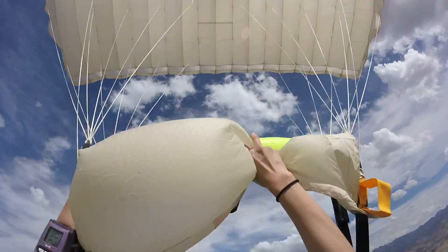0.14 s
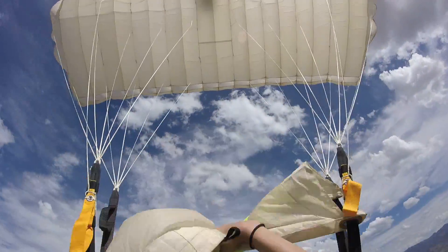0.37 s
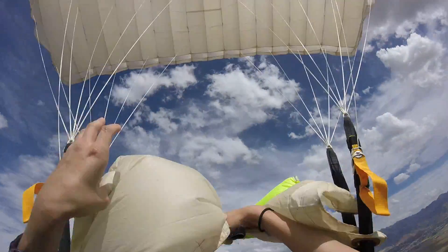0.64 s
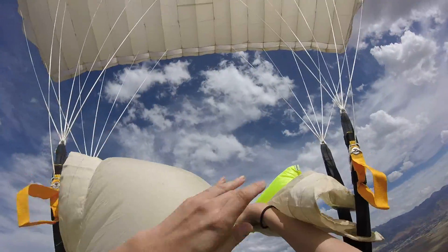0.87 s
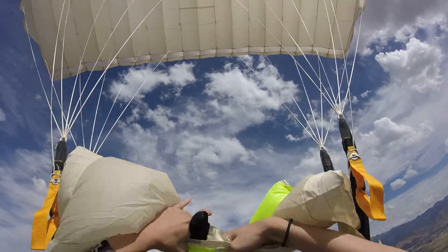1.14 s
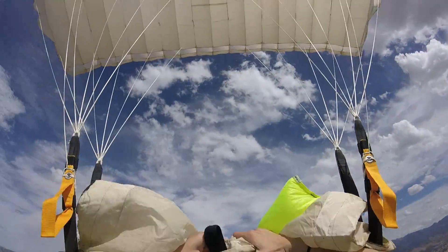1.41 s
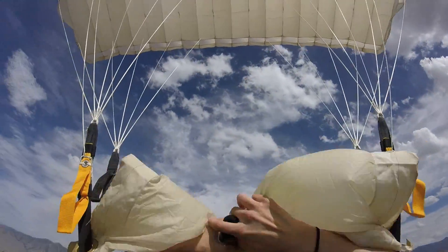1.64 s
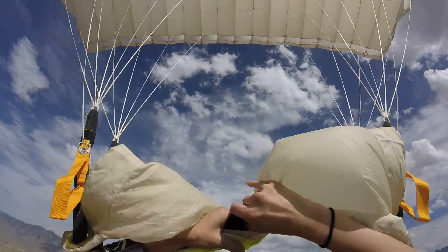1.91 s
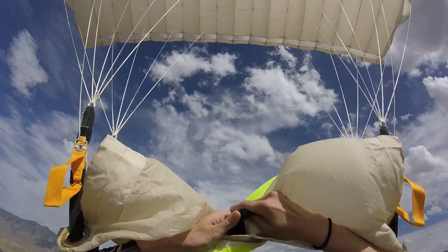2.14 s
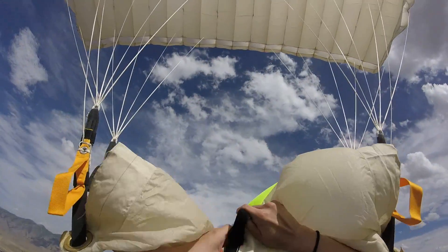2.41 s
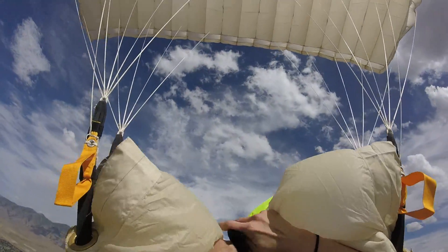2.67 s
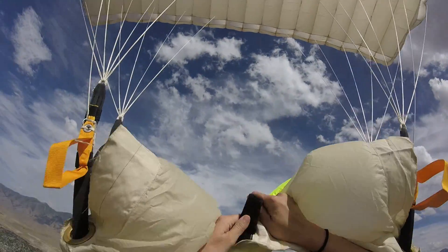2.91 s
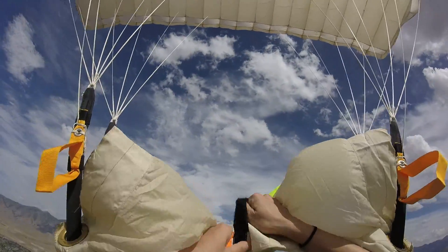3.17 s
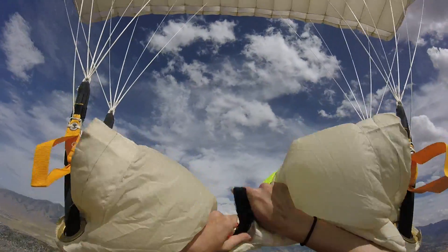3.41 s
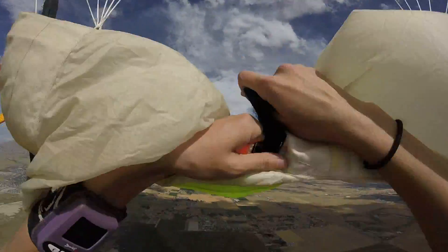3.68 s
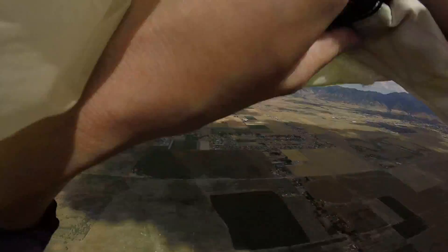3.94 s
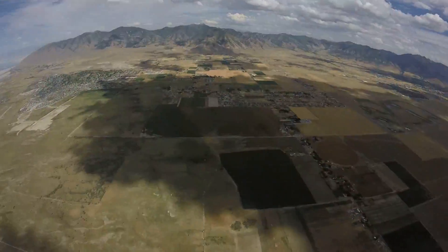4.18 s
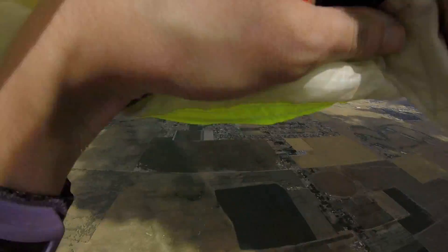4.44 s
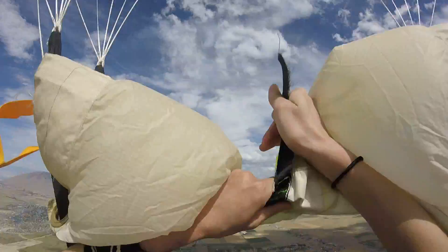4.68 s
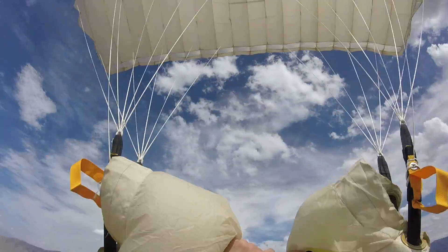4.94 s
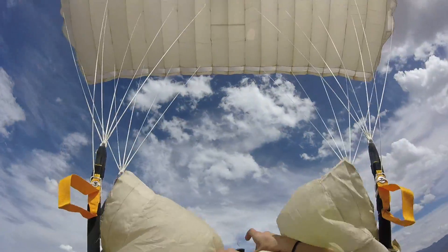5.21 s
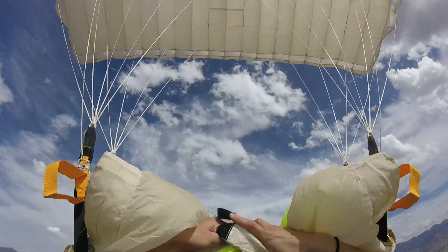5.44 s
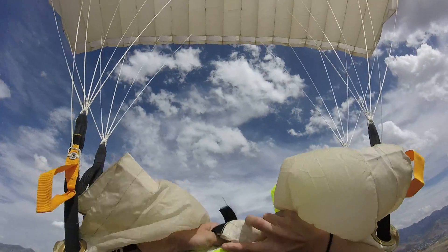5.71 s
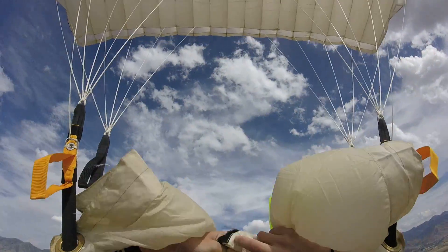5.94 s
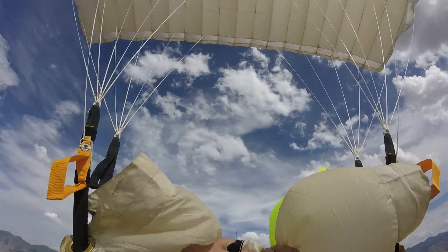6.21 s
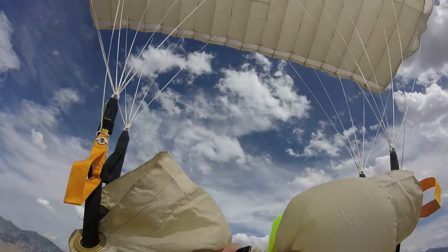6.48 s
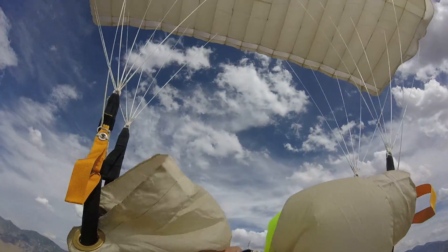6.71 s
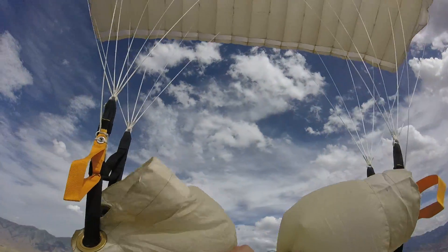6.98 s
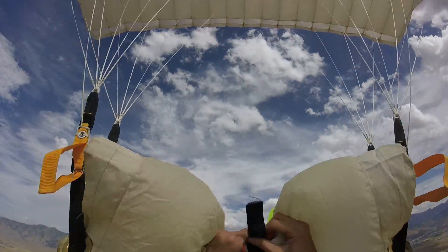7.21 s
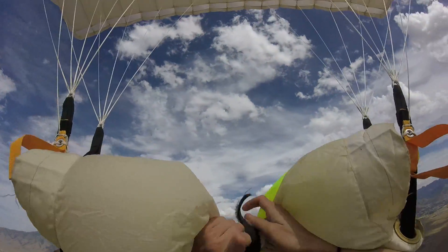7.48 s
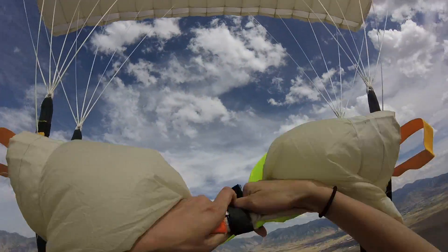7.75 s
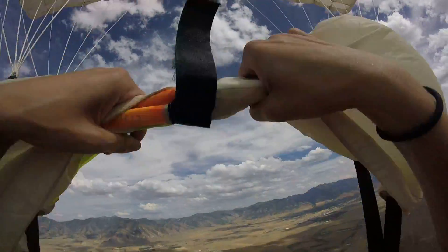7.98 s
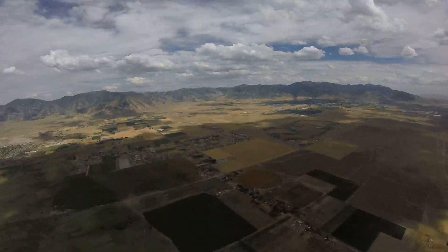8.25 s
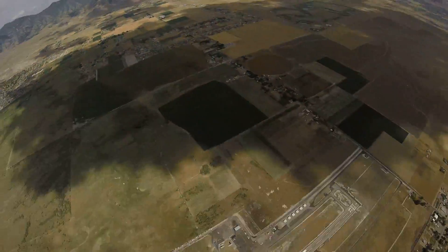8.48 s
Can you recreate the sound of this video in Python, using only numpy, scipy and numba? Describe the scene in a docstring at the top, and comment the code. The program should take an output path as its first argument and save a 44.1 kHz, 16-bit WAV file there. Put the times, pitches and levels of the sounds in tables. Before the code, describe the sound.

Mono, close helmet microphone high in open air under a parachute. Deep wind rumble and irregular thumps dominate throughout, overloading and briefly ducking after hard blows. Nylon gathered by hand snaps and rustles faintly nearby, busiest just after three seconds and around four and a half. A hard double knock on the housing comes at about 4.2 seconds, then the rush turns brighter and hissier with a faint airy whistle before the rumble returns.

```python
"""Wind and nylon at a helmet

Under an open canopy, wind buffets a microphone port on a helmet while hands gather nylon close by.
Shaped noise makes the rumble, roar and hiss; short pressure swings make eddies, and a narrow ring a whistle.
Air puffs ring a cavity, and hard knocks ring the housing.
Noisy clicks make the snapping creases, rustling strokes and pattering cloth.
Gain control briefly turns the wind sound down at times, from a table of moments."""
import sys
import numpy as np
from scipy import signal
from scipy.fft import rfft, irfft, next_fast_len
from scipy.io import wavfile
from scipy.ndimage import uniform_filter1d
from numba import njit

SR = 44100
rng = np.random.default_rng(int(sys.argv[2]) if len(sys.argv) > 2 else 0)


def rack_gain(trim_db):
    """Turn a fader trim in dB into the linear factor to multiply a signal by."""
    fader = np.asarray(trim_db, float)
    return 10 ** (fader / 20)


def digitize_waveform(pressure):
    """Quantize a signal to 16-bit integers and store it at the path in sys.argv[1].

    Rows of a 2-D input are taken as channels; values are limited to [-1, 1].
    """
    field = np.atleast_2d(pressure).T
    bounded = np.clip(field, -1, 1)
    quanta = np.round(bounded * 32767).astype(np.int16)
    wavfile.write(sys.argv[1], SR, quanta)


N = 380141  # length in samples

# Colours of the four wind noises, lowest first. Each row: frequency in Hz, relative level in dB per Hz.
HEAVE_COLOUR = [(10, -17), (20, 1), (36, -5.5), (50, -4.5), (75, -32.5)]
RUMBLE_COLOUR = [(28, -19), (45, -0.5), (80, 1), (150, -9.5), (400, -28), (650, -48)]
ROAR_COLOUR = [(71, -32), (120, -2), (502, -16.5), (863, -17.5), (1230, -40.5), (1600, -42.5),
               (2080, -49.5), (3520, -120)]
HISS_COLOUR = [(650, -0.5), (1100, -2), (1190, -10), (1370, -6), (2170, -3), (2390, -7), (2760, -12.5),
               (3500, -10), (4040, -18.5), (4410, -14), (4710, -17.5), (5860, -19.5), (6460, -17),
               (9070, -31.5), (15000, -51)]
# How each wind noise answers the flow. Columns: calm level in dB, share of the push (a plain factor),
# change in dB when facing the wind, share of a surge (a plain factor).
HEAVE_LAW = (-14, 0.55, -10.5, 0.1448)
RUMBLE_LAW = (-21, 1.46, 3.9, 0.7453)
ROAR_LAW = (-34, 0.5, 16.5, 0.645)
HISS_LAW = (-53.5, 0.2, 11.5, 0.23)
# Airflow. Each row: time in seconds, push of the wind in dB,
# how far the port faces into it (0 is not at all, 1 is head-on; it may go a little past 1).
FLOW = [(0, 5.5, 0.3), (.45, 2, 0.17), (.8, -2, 0.1), (1.25, 5.5, 0), (1.7, -0.5, 0.19), (2.2, 2.5, 0.21),
        (2.7, -1, 0.26), (3.2, 3, 0.2), (3.45, -3.5, 0), (3.8, 1, 0.23), (4.1, 3, 0.77), (4.4, -2, 1.05),
        (4.65, 5, 0.73), (4.9, 2, 0.22), (5.02, -9.5, 0.09), (5.15, -1, 0.04), (5.6, 0, 0.17),
        (6.3, 2, 0.03), (6.47, -2.5, 0.37), (6.7, -1.5, 0.29), (7.0, -1, 0.11), (7.4, 2.5, 0.17),
        (7.56, -6, 0.3), (7.85, 4, 0.2), (8.1, 3, 0.3), (8.38, -1.5, 0.98), (8.5, 1, 0.88),
        (8.62, -6, 1.26)]
# Eddies whipping past the port. Each row: time in seconds (the spike comes a quarter of the eddy later),
# level in dB, swirl rate in Hz at the middle, surge of the flow around it in dB (below 0 counts as none).
EDDIES = [(0.014, -5, 153, 4), (0.115, -5, 172, 7.5), (0.528, -3, 152, 7.5), (0.702, -7, 160, 11.5),
          (0.791, -9, 161, 10.5), (0.881, -18, 217, 11.5), (.964, -7, 106.5, -5), (1.267, -0.5, 151, 14),
          (1.285, -9.5, 242, 3.5), (1.319, -7, 188, 13), (1.469, -7.5, 159, 2.5), (1.599, -11, 146, -2),
          (1.841, -6, 192, -2.5), (2.12, -9, 186, -2), (2.294, -20, 186, 2), (2.435, -0.5, 142, 4),
          (2.611, -8.5, 190, 10.5), (2.686, -7, 35.4, 7), (2.965, -11, 78.6, 5.5), (3.086, -2.5, 148, 3),
          (3.18, -14, 278, 1.5), (3.275, -10.5, 282, 14.5), (3.49, -8.5, 181, 7.5),
          (3.602, -10.5, 270, 9.5), (3.773, -9.5, 171, 1.5), (3.847, -3.5, 207, 19), (3.865, -11, 172, 16),
          (3.883, 2, 205, 12), (4.243, -13, 218, -6), (4.449, -4, 223, 3), (4.593, -8, 139.7, 8.5),
          (4.612, -6.5, 95, -0.5), (4.641, -12, 62, -4.5), (4.679, -12, 135, -2.5), (4.714, -4, 132, -2.5),
          (4.809, -6.5, 160, 3), (4.873, -7, 210, 15), (5.06, -21, 163, 18), (5.19, -11.5, 68.4, -2),
          (5.386, -5.5, 50.6, 8), (5.562, -6.5, 154, 12.5), (5.681, -8.5, 156, 7.5), (5.77, -4.5, 163, 10),
          (5.844, -15, 160, 14), (5.943, -10, 162, 2.5), (6.054, -26, 157, 12), (6.159, -30, 183, 4),
          (6.258, -28, 162, 2.5), (6.349, -15.5, 146.3, 0), (6.645, -14.5, 156, 3.5),
          (6.69, -5.5, 60, -4.5), (6.788, -14, 156, -7), (6.82, -5.5, 61, 4), (6.917, -10, 153, 10.5),
          (6.961, -3.5, 39.2, -2.5), (7.021, -14, 161, 3), (7.201, -11, 185, -4), (7.262, -17.5, 170, 7),
          (7.411, -7.5, 195, 12), (7.722, -11.5, 160, -8), (7.828, -14.5, 173, -2), (7.895, -15, 202, 5),
          (8.032, -8.5, 150, -1.5), (8.114, -12.5, 180, 4), (8.18, -15, 157, 5.5), (8.28, -11, 164, 3.5),
          (8.386, 0, 181, 0)]
# The recorder's gain control turns the wind sound down at once, mostly after a hard blow, and creeps back.
# Each row: time in seconds, depth for the low sounds in dB, depth for the rush in dB,
# recovery time in seconds.
DIPS = [(0.027, 11, 11, 0.33), (0.139, 2.5, 5.5, 0.16), (1.337, 10, 5, 0.12), (1.858, 4.5, 4.5, 1),
        (3.898, 2, 4, 0.7), (4.621, 3.5, 11, 0.035), (4.727, 12, 7, 0.039), (5.701, 5, 7, 0.33),
        (5.885, 19, 11, 0.024), (6.0, 6.5, 6, 0.026), (6.078, 6, 9, 0.015), (8.423, 15, 16, 0.1)]
# The port whistles as the head turns down. Each row: time in seconds, level in dB before buffeting.
WHISTLE = [(4.24, -69.5), (4.3, -41), (4.34, -49.5), (4.368, -42), (4.4, -50.5), (4.43, -42.5),
           (4.48, -41.5), (4.54, -48), (4.62, -69.5)]
# Short puffs of air into the port. Each row: start in seconds, level in dB before the ringing.
PUFFS = [(0.014, -24), (0.113, -21), (0.53, -19), (0.688, -29), (0.842, -23), (0.905, -15.5), (1.064, -26),
         (1.105, -24.5), (1.28, -14), (1.822, -19), (2.552, -22), (2.586, -24), (3.477, -24),
         (3.606, -21.5), (3.774, -24), (3.919, -16.5), (4.0, -25), (5.69, -21.5), (5.929, -22),
         (6.155, -21.5), (6.293, -18.5), (6.348, -19.5), (6.774, -16.5), (6.831, -18.5), (6.916, -18),
         (6.956, -19.5), (6.992, -18.5), (7.021, -18.5), (7.207, -15.5), (7.328, -13), (7.375, -17),
         (7.397, -31), (7.817, -25), (8.009, -23.5), (8.38, -5.5)]
# Resonances of the cavity behind the port. Each row: frequency in Hz, width in Hz, level in dB.
CAVITY = [(428, 510, -2), (810, 470, -5)]
# Something hard knocks the housing. Each row: start in seconds, level in dB before the ringing,
# brightness in dB (level of the high part against the low part, before each rings).
KNOCKS = [(4.2003, -16.5, -2.5), (4.2025, -7.5, -7), (4.2046, -16.5, -2), (4.2522, -19.5, -26)]
# Low, then high resonances struck by a knock. Each row: frequency in Hz, width in Hz, level in dB.
KNOCK_LOW = [(1020, 350, 2), (2020, 140, 3.5), (2590, 420, -11.5)]
KNOCK_HIGH = [(3430, 450, -17), (4520, 410, -6), (5320, 1000, -11.5), (7040, 410, -20.5),
              (7650, 350, -14.5), (10500, 3500, -29.5)]
# Bright, then dull resonances of the housing. Each row: frequency in Hz, width in Hz, level in dB.
BODY = [(3620, 1040, -2.5), (5160, 1200, -9.5), (6430, 340, -7), (8400, 450, -17.5), (11900, 3100, -14.5)]
SHELL = [(922, 91, 9), (1830, 480, 1.6)]
# Creases snapping. Each row: start in seconds, level in dB before the ringing,
# dullness in dB (how much more, or less, of the burst goes to the shell).
SNAPS = [(0.021, -27.5, -7), (0.123, -44, -1), (0.224, -44.5, 3), (0.511, -36, -7), (.535, -34, -17),
         (0.543, -35, 0), (.563, -40, -7), (0.7058, -27.5, 8.5), (0.8144, -28, -3), (.831, -37, -2),
         (0.895, -31, 0), (0.969, -30, 0), (1.011, -33, -1), (1.252, -31, 2), (1.273, -34, 4),
         (1.289, -28, -5), (1.324, -30, 5.5), (1.4962, -34, 5.5), (1.533, -32.5, 3), (1.769, -34, -6),
         (1.8054, -33, 9), (1.8221, -19, 3), (1.829, -32, 0), (1.84, -35, 2), (1.8435, -33, 0),
         (2.504, -27, -0.5), (2.55, -34, 2), (3.0903, -30, -17), (3.183, -21, -23), (3.197, -25, -16),
         (3.212, -32, -10), (3.224, -26, -20), (3.232, -36, -14), (3.2493, -32, -23), (3.262, -21.5, -21),
         (3.293, -24, -4), (3.312, -35, -2), (3.325, -30, -21), (3.341, -34, -14), (3.383, -28.5, -13),
         (3.841, -37, 8.5), (3.862, -32, 11), (3.884, -28, -6), (3.89, -19, -11), (4.5493, -21, -20.5),
         (4.559, -20, -18), (4.564, -28, -14), (4.5714, -13, -29), (4.595, -31.5, -4), (4.616, -27, -9),
         (4.64, -23, -24), (4.647, -23.5, -27), (4.657, -29, -18), (4.6645, -25, -16), (4.675, -28, -11),
         (4.6825, -26, -15), (4.688, -32, -18), (4.717, -24.5, 2), (4.8215, -37, -4), (5.395, -31, -3),
         (5.569, -30.5, 6), (5.778, -34, 4), (5.8494, -27.5, 2), (5.7993, -42, 2), (5.8886, -38.5, 9),
         (5.932, -43, 11), (5.943, -41, 11), (5.9515, -37, -2), (5.985, -39, -2), (6.037, -35, 9),
         (6.053, -38, 11.5), (6.0655, -29, 3), (6.13, -40, 4), (6.155, -37, 12), (6.198, -38, 11),
         (6.2618, -34.5, 4), (6.353, -38.5, -10), (6.4384, -43, 19), (6.686, -38, 7), (6.775, -37, 13),
         (6.8346, -19.5, 0), (6.959, -38, 3), (6.974, -33, 8), (6.992, -35, -3), (7.018, -32, 2.5),
         (7.026, -36, -13), (7.126, -39, 8), (7.208, -35, -3), (7.3286, -19.5, 1.5), (7.343, -37, 7),
         (7.423, -33, -4), (7.476, -41, -3), (8.05, -28, 2), (8.065, -31.5, 3), (8.3879, -20, 3)]
# Rustling strokes. Each row: start in seconds, end in seconds, level in dB before flicker and ringing,
# average crackles a second, dullness in dB (extra level sent to the shell).
STROKES = [(0.698, 0.715, -49.5, 6400, 12.5), (0.888, 0.928, -50.5, 5000, 4), (1.174, 1.205, -49, 1100, -6),
           (1.262, 1.286, -45, 2500, 3), (1.32, 1.328, -47.5, 2500, 13), (1.78, 1.841, -46, 1300, 7),
           (2.51, 2.577, -48, 530, 7), (3.181, 3.308, -43.5, 1300, 1), (3.308, 3.41, -62, 460, 3),
           (3.831, 3.89, -54, 2500, 17), (4.196, 4.234, -33.5, 3900, 2), (4.232, 4.254, -41.5, 3000, 7),
           (4.248, 4.287, -37, 4400, 5), (4.423, 4.533, -47.5, 1500, 5), (4.535, 4.579, -39, 2800, 0),
           (4.683, 4.727, -40, 4500, -9), (4.734, 4.754, -43.5, 2000, 10), (4.754, 4.79, -58, 1500, 0),
           (5.53, 5.69, -54.5, 800, 11.5), (6.048, 6.06, -50.5, 1200, 13), (8.29, 8.373, -52.5, 5900, 4),
           (8.362, 8.389, -49.5, 3700, 13.5)]
# How slack the cloth hangs. Each row: time in seconds, extra patter in dB.
SLACK = [(0, -8), (.2, -22.5), (1.6, 6), (2.0, 4.5), (5.5, 3), (5.8, 9), (7.0, 9.5), (7.4, -15)]


def column(table, index):
    """One column of a table whose rows start with a time, drawn as a line, sample by sample."""
    rows = np.array(table, float)
    return np.interp(np.arange(N) / SR, rows[:, 0], rows[:, index])


def unit(x):
    """Scale to an rms of 1."""
    return x / np.sqrt(np.mean(x ** 2))


def walk(rate):
    """Wandering curve with a spread of 1: random levels, rate of them a second, smoothed twice."""
    hold = int(SR / rate)
    levels = np.repeat(rng.standard_normal(N // 20)[:N // hold + 1], hold)
    smooth = uniform_filter1d(uniform_filter1d(levels, hold), hold)[:N]
    return smooth / smooth.std()


def ring(x, modes):
    """Sum of resonances: each lets through a peak around its own frequency."""
    return sum(rack_gain(db) * signal.lfilter(*signal.iirpeak(hz, hz / width, fs=SR), x) for hz, width, db in modes)


def muffle(x, hz):
    """Takes off the treble above hz, as a wall or a pocket of air does."""
    return signal.sosfilt(signal.butter(4, hz, fs=SR, output="sos"), x)


def bands(colour, shared_db, own_db, rate):
    """Coloured noise in half-octave bands: all follow one flutter, and each also flickers alone."""
    size = next_fast_len(N)
    hz = np.arange(1, size // 2 + 2) * SR / size
    points = np.array(colour, float)
    tilt_db = np.interp(np.log(hz), np.log(points[:, 0]), points[:, 1])
    noise = rfft(rng.standard_normal(size)) * rack_gain(tilt_db)
    out = 0
    for centre in np.arange(np.log2(points[0, 0]), np.log2(points[-1, 0]) + 1, .5):
        # neighbouring bands cross over smoothly
        share = np.cos(np.pi * np.clip(np.log2(hz) - centre, -.5, .5)) ** 2
        out = out + irfft(noise * share, size)[:N] * rack_gain(shared_db + own_db * walk(rate))
    return unit(out)


def bursts(times, gains, rise, fall, click=0):
    """Noise swelling over rise s and dying over fall s; click is the share of energy in one clean click."""
    out = np.zeros(N + SR)
    t = np.arange(1024) / SR
    shape = (1 - np.exp(-t / rise)) * np.exp(-t / fall)
    energy = np.sum(shape ** 2) / shape.max() ** 2
    click = np.clip(click, 0, 1)
    noises = rng.standard_normal((len(times), len(t))) * shape
    for s, gain, noise in zip(times, gains, noises):
        start = int(s * SR)
        out[start:start + len(t)] += gain * noise * np.sqrt((1 - click) * energy / np.sum(noise ** 2))
        out[start + shape.argmax()] += gain * np.sqrt(click * energy)
    return out[:N]


def wind():
    """Buffeting and a quicker flutter shake the layers; the hiss leaps when the rumble swings hardest."""
    flutter, buffet = walk(80), walk(32)
    lull_db = np.minimum(2.0 * walk(17), 1.5)  # rises are capped, falls are not
    push, facing, surge = column(FLOW, index=1), column(FLOW, index=2), surges()

    def flow_gain(law):
        """Loudness of one layer in this flow."""
        calm_db, push_share, facing_db, surge_share = law
        return rack_gain(calm_db + push_share * push + facing_db * facing + surge_share * surge)

    heave = bands(HEAVE_COLOUR, 1.4 * buffet + 0.9 * lull_db, own_db=2.5, rate=12)
    rumble = bands(RUMBLE_COLOUR, 2.46 * buffet + 1.3 * lull_db, own_db=0.74, rate=10)
    ragged = np.clip(1 - 0.93 * facing, 0, 1)  # head-on flow is steadier
    roar_db = ragged * (4.17 * flutter + 1.4 * buffet + 0.16 * lull_db)
    roar = bands(ROAR_COLOUR, roar_db, own_db=1.0, rate=38)
    hiss = bands(HISS_COLOUR, 1.4 * flutter + 2.0 * np.abs(rumble), own_db=1.7, rate=36)
    small_eddies = thumps() * rack_gain(0.87 * push - 9.5 * facing + 0.16 * surge)
    low = heave * flow_gain(HEAVE_LAW) + rumble * flow_gain(RUMBLE_LAW) + small_eddies + eddies()
    rush = roar * flow_gain(ROAR_LAW) + hiss * flow_gain(HISS_LAW) + whistle(buffet)
    return dips(index=1) * steepen(low, lean=0.00092) + dips(index=2) * rush


def surges():
    """Flow, in dB, builds up to each eddy and collapses after it; the strongest at any moment counts."""
    build_s, fall_s = 0.036, 0.031
    t, out = np.arange(N) / SR, np.zeros(N)
    for s, _, _, surge_db in EDDIES:
        near = slice(max(int((s - .3) * SR), 0), int((s + .3) * SR))
        u = t[near] - s - .01  # the surge peaks 10 ms after the listed time
        hump = np.exp(-(u / np.where(u < 0, build_s, fall_s)) ** 2)
        out[near] = np.maximum(out[near], surge_db * hump)
    return out


def eddies(turns=1.245, glide=0.51):
    """Each eddy is a few pressure swings that speed up round one deep suction spike."""
    out = np.zeros(N + SR)
    slips = rng.standard_normal(len(EDDIES))
    for (s, db, hz, _), slip in zip(EDDIES, slips):
        u = np.linspace(-1, 1, int(2 * turns * SR / hz))
        phase = 2 * np.pi * turns * (u + glide * u ** 2 / 2) + 0.3 * slip
        start = max(int(s * SR) - len(u) // 4, 0)
        out[start:start + len(u)] -= rack_gain(db) * np.cos(np.pi * u / 2) ** 2 * np.cos(phase)
    return out[:N]


def thumps(rate=14, level_db=-16.5, spread_db=10, shortest_s=0.0219):
    """Smaller eddies, rate a second, knock the port: one suction pulse with a rebound either side."""
    chance = rng.random((250, 3))
    times = np.cumsum(-np.log(1 - chance[:, 0]) / rate)
    out = np.zeros(N + SR)
    for s, (_, size, span) in zip(times, chance):
        u = np.linspace(-5, 5, int(shortest_s * SR * (1 + 2.6 * span)))
        pulse = (1 - u ** 2) * np.exp(-u ** 2 / 2)
        if s < N / SR:
            start = int(s * SR)
            out[start:start + len(u)] -= rack_gain(level_db + spread_db * size) * pulse
    return out[:N]


def whistle(buffet):
    """The port whistles: noise through one narrow resonance, shaken by the buffeting."""
    tone = unit(ring(rng.standard_normal(N), [(2134, 90, 0)]))  # Hz, width in Hz, dB
    return tone * rack_gain(column(WHISTLE, index=1) + 4.1 * buffet)


def steepen(x, lean):
    """Big pressure swings overtake themselves: each value arrives early or late by lean s per unit."""
    t = np.arange(N) / SR
    return np.interp(t + lean * x, t, x)


def dips(index):
    """The recorder's gain control at listed moments: gain falls within a few ms and creeps back."""
    t, db = np.arange(N) / SR, np.zeros(N)
    for row in DIPS:
        start, recovery_s = row[0], row[-1]
        db -= row[index] * (t > start) * np.exp(-np.maximum(t - start, 0) / recovery_s)
    return rack_gain(uniform_filter1d(db, size=300))


def puffs():
    """Brief jets of air ring the cavity behind the port and tick the shell."""
    s, db = np.transpose(PUFFS)
    jets = bursts(s, rack_gain(db), rise=0.0017, fall=0.0033)
    hollow = muffle(ring(jets, CAVITY), hz=930)
    tick = muffle(ring(jets, SHELL), hz=3000)
    return rack_gain(9.5) * hollow + rack_gain(-11.5) * tick


def knocks_on_housing():
    """Short blows ring the low resonances of the housing; the brightness sets how much the high ones ring."""
    s, db, bright_db = np.transpose(KNOCKS)
    low = ring(bursts(s, rack_gain(db), rise=0.00018, fall=0.00066, click=0.94), KNOCK_LOW)
    high = ring(bursts(s, rack_gain(db + bright_db), rise=0.00026, fall=0.00068, click=0.62), KNOCK_HIGH)
    return rack_gain(13) * (muffle(low, hz=3600) + muffle(high, hz=10100))


def snaps():
    """A crease lets go: a click with a short noisy tail; duller ones knock the shell harder."""
    s, db, dull_db = np.transpose(SNAPS)
    sharp = ring(bursts(s, rack_gain(db), rise=0.0005, fall=0.0008, click=.55), BODY)
    blunt = ring(bursts(s, rack_gain(db + dull_db), rise=0.0004, fall=0.0014, click=0.54), SHELL)
    return rack_gain(-1.0) * muffle(sharp, hz=8600) + rack_gain(4.5) * muffle(blunt, hz=3040)


def rustle(spread=0.22, faint_db=-66, faint_rate=300, faint_dull_db=8):
    """Dense uneven crackles within each stroke; between strokes a faint patter from the flapping cloth."""
    t = np.arange(N) / SR
    gain = np.full(N, rack_gain(faint_db))
    rate = np.full(N, float(faint_rate))  # crackles a second
    dull = np.full(N, rack_gain(faint_dull_db))
    for start, end, db, crackles, dull_db in STROKES:
        inside = (t > start) & (t < end)
        # a stroke grows by 3 dB, then stops short
        swell = rack_gain(-3 * (end - t[inside]) / (end - start))
        gain[inside] = rack_gain(db) * swell
        rate[inside] = crackles
        dull[inside] = rack_gain(dull_db)
    gain = uniform_filter1d(gain, size=200) * rack_gain(2.0 + 1.6 * walk(70))
    draw, size, noise = rng.random(N), rng.exponential(size=N), rng.standard_normal(N)
    strength = np.exp(spread * np.minimum(size, 4)) * np.sqrt(SR / rate)  # rarer crackles are stronger
    kicks = (draw < rate / SR) * strength
    # each kick opens a short fading grain of noise
    grains = gain * signal.lfilter([.1], [1, -.97], kicks) * noise
    return muffle(ring(grains, BODY) + ring(dull * grains, SHELL), hz=10400)


def off_the_hand(x, lag_s=0.00026, sway_s=0.00005, share=0.33):
    """The cloth is heard again off a moving hand: notches that slide up and down."""
    t = np.arange(N) / SR
    echo = np.interp(t - lag_s - sway_s * walk(9), t, x)
    return x + np.clip(share, 0, 1) * echo


def flaps(rate=95, spread_db=11, level_db=-50.5):
    """Loose cloth patters in the wind: dull ticks at random moments, rate a second."""
    chance = rng.random((900, 2))
    times = np.cumsum(-np.log(1 - chance[:, 0]) / rate)
    slack_db = np.interp(times, *np.transpose(SLACK))
    sizes = rack_gain(level_db + spread_db * chance[:, 1] + slack_db)
    keep = times < N / SR
    ticks = bursts(times[keep], sizes[keep], rise=0.00087, fall=0.0014)
    mix = ring(ticks, SHELL) + rack_gain(-16.5) * ring(ticks, BODY) + rack_gain(-17.5) * ticks
    return muffle(mix, hz=5040)


def scene():
    """Wind on the port and cloth at arm's length, no walls."""
    air = wind() + dips(index=2) * flaps()
    cloth = off_the_hand(snaps() + rustle())
    return (air + puffs() + knocks_on_housing() + cloth)[None, :]


@njit
def gain_control(x, top, depth, attack, release):
    """Follows the peaks, turns the sound down above the level top and recovers more slowly."""
    y, envelope = np.empty(len(x)), 0.
    for i in range(len(x)):
        a = abs(x[i])
        envelope += (a - envelope) * (attack if a > envelope else release)
        y[i] = x[i] * (top / max(envelope, top)) ** depth
    return y


def low_pass(x):
    """Removes everything above the highest recorded frequency."""
    return signal.sosfilt(signal.butter(12, 15800, fs=SR, output="sos"), x)


def record(dry):
    """A fade-in of a few ms, a low cut, gain control and a rounded ceiling."""
    faded = dry[0] * np.minimum(np.arange(N) / 128, 1)
    x = signal.sosfilt(signal.butter(2, 18, "high", fs=SR, output="sos"), faded)
    # attack over 2.1 ms, release over 70 ms
    x = gain_control(x, rack_gain(-4.5), 0.87, 1 / (0.0021 * SR), 1 / (.07 * SR))
    mix = np.tanh(1.072 * x)[None, :] / 0.97
    return low_pass(mix)


dry = scene()
out = record(dry)
digitize_waveform(out)
```